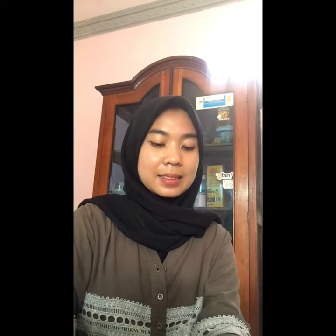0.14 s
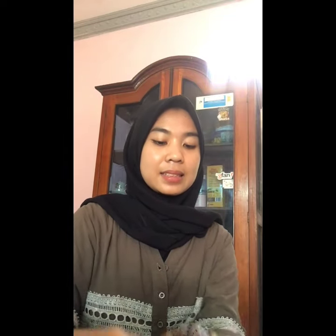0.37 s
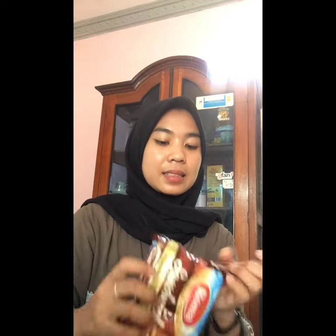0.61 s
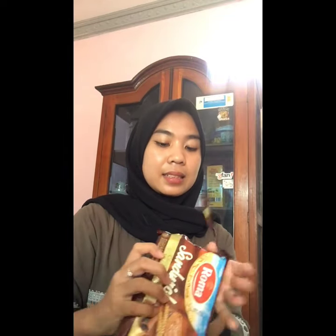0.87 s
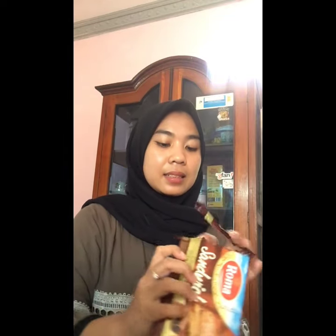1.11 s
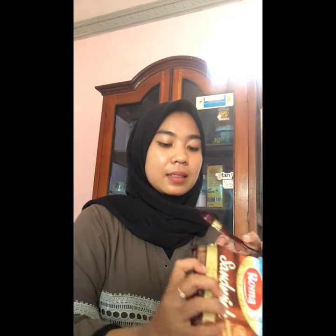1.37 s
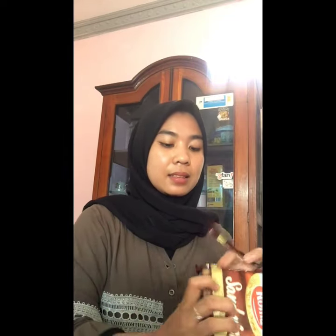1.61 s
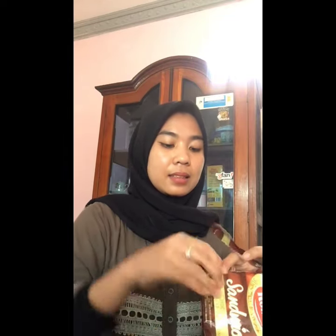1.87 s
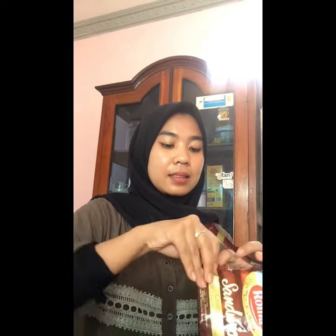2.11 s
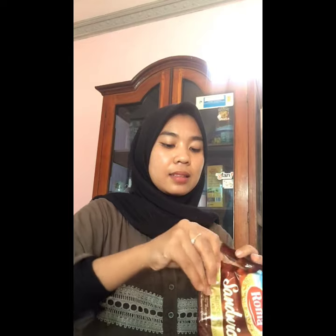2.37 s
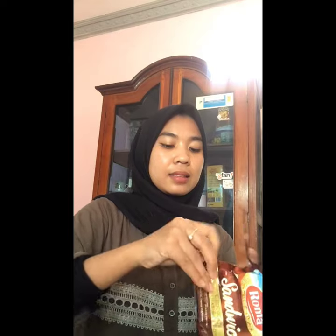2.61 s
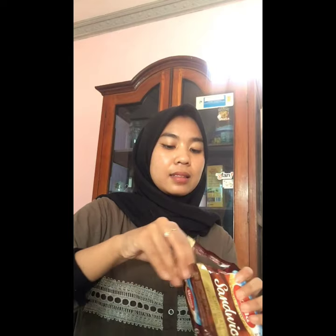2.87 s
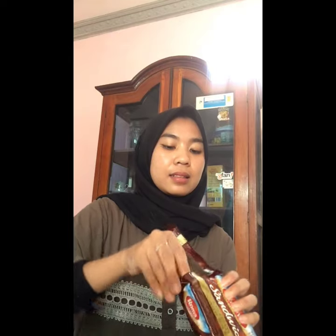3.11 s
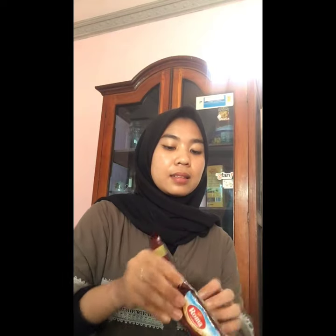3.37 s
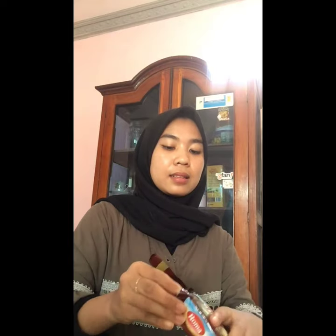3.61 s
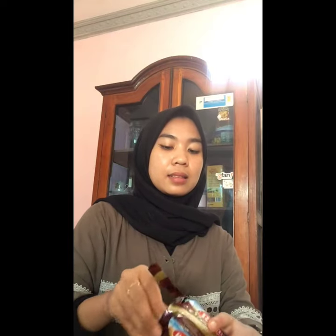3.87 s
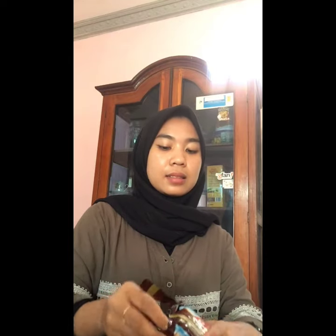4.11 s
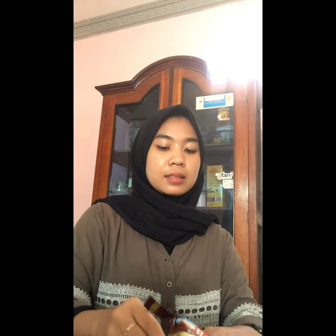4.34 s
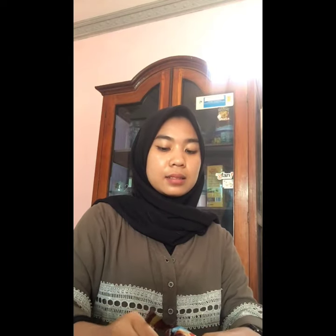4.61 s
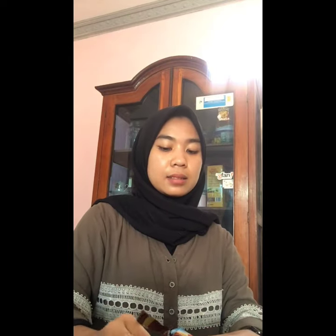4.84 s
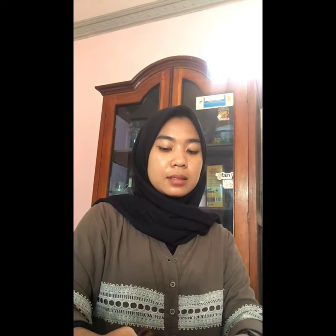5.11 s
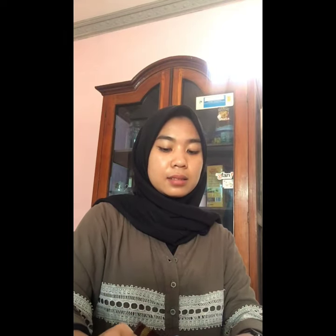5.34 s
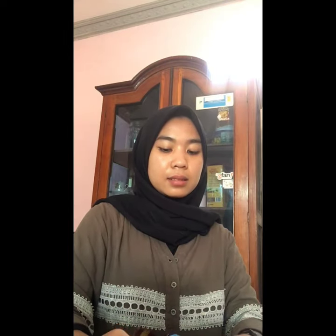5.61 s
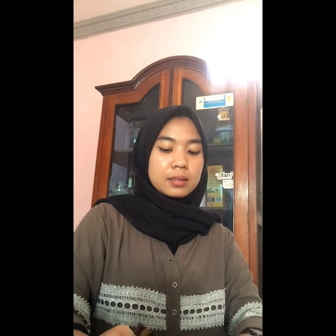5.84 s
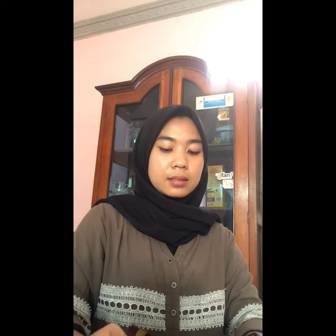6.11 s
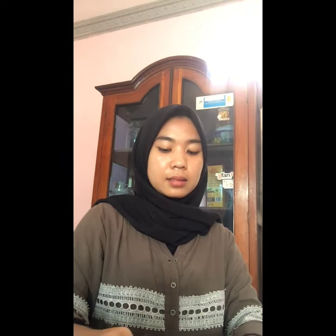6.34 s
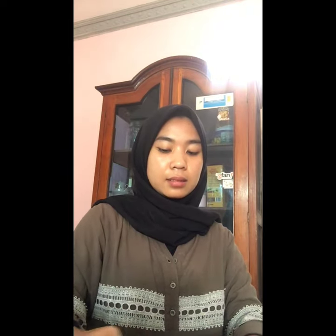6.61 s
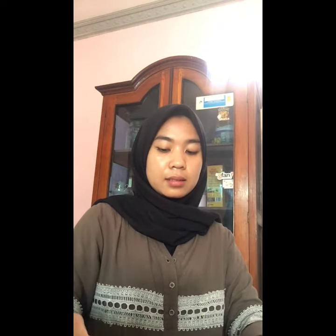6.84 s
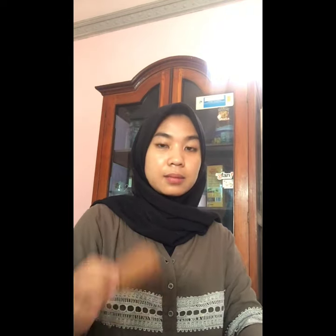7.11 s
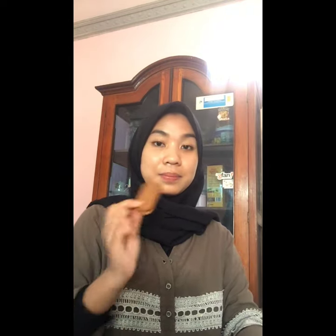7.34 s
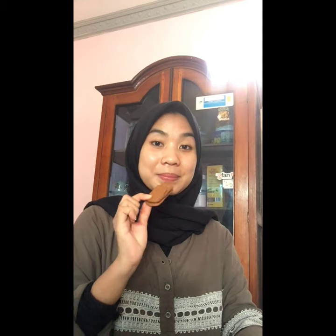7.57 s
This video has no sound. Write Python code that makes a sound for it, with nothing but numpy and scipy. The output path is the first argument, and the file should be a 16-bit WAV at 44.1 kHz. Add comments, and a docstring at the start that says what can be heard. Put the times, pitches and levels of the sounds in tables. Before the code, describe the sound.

In a small room, a phone on a table hears a plastic snack wrapper at close range. From 0 to 0.4 s it crunches and snaps busily, with a heavy low bump near 0.4. Lighter crackles continue to about 1 s, then a lull. At 1.7 s come a bump and short crinkles; at 2.25-2.4 s a tight run of bright, hard snaps as the seam is pulled, the sharpest at 2.36. Scattered crinkles follow, with a bump at 2.8 and another cluster from 3.4 to 4.4, including a thud at 4.2. A distant engine's low hum, present from about 0.5, is strongest around 3.7-5, then sinks in pitch and vanishes by 5.9. Crunches and bumps return from 5.6 to 6.85, with a strong snap at 6.3 and brief gritty rubbing near 6.7. After that only low rumble, faint hiss and tiny ticks remain, with a soft bump at 7.7.

```python
"""Hands lift, crinkle and tear a plastic snack wrapper in a small room: modal bumps of the table that the phone
stands on, crackle of filtered random puffs, and creases that snap as damped resonances with a bright tick.
A distant engine then drones past outside as a sum of shaft orders, its pitch sinking. Filtered noise gives
the rumble, far roar and microphone hiss; a narrow noise band gives a faint airy tone."""
import sys
import numpy as np
from scipy import signal
from scipy.fft import rfft, irfft, next_fast_len
from scipy.io import wavfile
from scipy.ndimage import map_coordinates

SR = 44100
rng = np.random.default_rng(int(sys.argv[2]) if len(sys.argv) > 2 else 0)


def volts_from_decibels(level):
    """Turn decibel levels (scalar or array-like) into linear amplitude factors."""
    exponent = np.asarray(level, float) / 20
    return 10 ** exponent


def output_pcm(signal):
    """Save a mono or channel-first signal as 16-bit PCM at the path in sys.argv[1].

    Samples are clipped to [-1, 1] before scaling.
    """
    pcm = np.clip(np.atleast_2d(signal).T, -1, 1) * 32767
    wavfile.write(sys.argv[1], SR, np.round(pcm).astype(np.int16))


N = 340168  # length [samples]

# Fingers resting and shifting on the film: (time [s], crackle level [dB])
HANDS = [(0, -66), (.5, -56.5), (.8, -54), (1.0, -60.5), (1.15, -57.5), (2.1, -59), (2.5, -55.5),
         (3.26, -58.5), (3.44, -52), (4.2, -49), (4.28, -58), (4.94, -51.5), (5.2, -56.5), (5.45, -57.5),
         (5.58, -67.5), (6.2, -66), (7.0, -66), (7.71, -71.5)]
# Bright part of the crackle and of the snaps: (frequency [Hz], relative density [dB per Hz])
CRISP = [(1500, -38), (2050, -11), (2550, -14), (2950, -6.5), (3250, -4.5), (3650, -6), (4400, -9),
         (5200, -15.5), (6500, -21), (8500, -37), (11000, -30), (15000, -39), (17000, -76)]


def unit(x):
    """Normalisation to unit root-mean-square value."""
    return x / np.sqrt(np.mean(x ** 2) + 1e-20)


def curves(rows):
    """Linear interpolation in time: one value per sample for each column after the time."""
    times, *columns = np.transpose(rows)
    return [np.interp(np.arange(N) / SR, times, column) for column in columns]


def along(points, hz):
    """Interpolation of (frequency [Hz], value) points on a logarithmic frequency axis."""
    f, values = np.transpose(points)
    return np.interp(np.log(hz + 1), np.log(f + 1), values)


def wobble(rate):
    """Band-limited random modulation: a smooth curve through random knots, rate of them a second."""
    coarse = np.arange(0, N + 16, 16)
    knots = rng.standard_normal(int(N * rate / SR) + 4)
    smooth = map_coordinates(knots, [coarse * rate / SR])
    return np.interp(np.arange(N), coarse, smooth)


def coloured(x, spectrum):
    """Minimum-phase filtering: folding the cepstrum makes the filter of a given spectrum causal."""
    m = 2 * next_fast_len(N // 2 + SR // 4)
    magnitude = volts_from_decibels(along(spectrum, np.fft.rfftfreq(m, 1 / SR)))
    cepstrum = irfft(np.log(magnitude + 1e-6), m)
    cepstrum[1:m // 2] *= 2
    cepstrum[m // 2 + 1:] = 0
    response = np.exp(rfft(cepstrum))
    return irfft(rfft(x, m) * response, m)[:N]


def add(track, s, sound):
    """Superposition: mix a sound in at s seconds; it may be under way at the start."""
    i = round(s * SR)
    track[max(i, 0):i + len(sound)] += sound[max(-i, 0):]


def bumps():
    """Dispersion of bending waves in the table top: high modes arrive first, the low bounce builds up last."""
    # Bumps of the pack and the arms:
    # (time [s], base level [dB], bounce frequency [Hz], modes below 200 Hz [dB], modes above [dB])
    blows = [(-0.006, -24, 73, 1.5, 0.5), (0.023, -35, 78, -8, 14.5), (0.188, -32, 75.3, 0, -5),
             (0.26, -26, 62.8, -6, -18), (0.393, -16, 64.6, -1.5, -7.5), (1.698, -30, 67, -1.5, -10.5),
             (2.137, -43, 78, 0, 6), (2.2, -42.5, 79, 15.5, 0), (2.797, -28.5, 60.4, -1.5, -5.5),
             (3.636, -29, 68, -10, -13), (4.002, -30, 67.7, -6, -9.5), (4.198, -21.5, 66.1, -5, -14),
             (5.321, -33, 63.5, 3.5, 1.5), (5.627, -34.5, 79.4, -18, -30), (5.751, -31.5, 76, 4.5, -6),
             (5.848, -34.5, 75.6, 2.5, -13), (6.02, -22.5, 63.4, -1.5, -14), (6.371, -33, 75.7, 7, -26),
             (6.657, -29, 64.5, 6.5, -12), (6.698, -29, 61.7, 4.5, -5), (6.778, -30.5, 82, 1, -7.5),
             (6.844, -30.5, 67, 1.5, -11.5), (7.669, -31, 83, 3.5, -7.5)]
    # Modes of the table top: (frequency [Hz], relative level [dB], 60 dB decay time [s])
    table_modes = [(106.9, -8.5, 0.23), (130, 0, 0.18), (147, -8, 0.14), (261, -1.5, 0.16),
                   (294.8, 0.5, 0.1), (374, -5.5, 0.086), (540, -11, 0.059)]
    still_s, still_db_per_s = 6.868, 1200  # the ringing stops short, as under a resting hand
    out, t = np.zeros(N + SR), np.arange(SR // 2) / SR

    def ring(hz, t60):
        build_up = 1 - np.exp(-(t * hz / 1.17) ** 2)
        return volts_from_decibels(-60 * t / t60) * build_up * np.sin(2 * np.pi * hz * t)

    for s, db, bounce_hz, panel_db, knock_db in blows:
        chance = rng.standard_normal(len(table_modes))
        modes = 0
        for (f, mode_db, t60), c in zip(table_modes, chance):
            drive_db = panel_db if f < 200 else knock_db
            modes = modes + volts_from_decibels(drive_db + mode_db + 2.0 * c) * ring(f, t60)
        damping = volts_from_decibels(-still_db_per_s * (s < still_s) * (s + t - still_s).clip(0))
        add(out, s, volts_from_decibels(db + 3) * (ring(bounce_hz, 0.35) + modes) * damping)
    return out[:N]


def air():
    """Stationary noise shaped by spectra: rumble through the walls, fluttering far roar, hiss and an airy tone."""
    # Background: (time [s], mean rumble level [dB], mean distant roar level [dB])
    background = [(0, -37.5, -62), (.6, -45, -53.5), (1.5, -50, -56), (2.5, -43, -54.5),
                  (3.5, -46.5, -52.5), (4.5, -47.5, -53.5), (5.3, -40.5, -53), (5.9, -39.5, -61.5),
                  (6.8, -43, -58.5), (7.1, -45, -64), (7.71, -43, -61.5)]
    # Spectra of the four noises: (frequency [Hz], relative density [dB per Hz])
    rumble_spectrum = [(12, -67.5), (20, -31), (45, -13.5), (64, -8.5), (76, -5), (89, 0), (102, -9),
                       (129, -9), (189, -11.5), (205, -14.5), (354, -18.5), (480, -41.5), (620, -64.5),
                       (1060, -120)]
    roar_spectrum = [(250, -39.5), (380, -6), (450, -1), (600, 1), (950, -9), (1400, -17.5), (2200, -24.5),
                     (3200, -31), (5200, -52), (8000, -56.5), (12000, -89)]
    hiss_spectrum = [(1500, -35), (3500, 0.5), (6500, -7.5), (9500, -10.5), (10400, -14.5), (13000, -13),
                     (15500, -20)]
    early_spectrum = [(2500, -20.5), (5000, 1), (9000, -2), (10300, -4), (11500, -5), (15500, -6.5),
                      (17000, -61.5)]
    # A faint airy tone sinks and fades: (time [s], centre frequency [Hz], gain [dB])
    airy_path = [(.42, 2890, -93), (.55, 2780, -74), (.8, 2610, -72), (1.1, 2450, -75), (1.3, 2420, -100)]

    def noise(spectrum):
        return unit(coloured(rng.standard_normal(N), spectrum))

    rumble_db, roar_db = curves(background)
    rumble = volts_from_decibels(rumble_db + 1.3 * wobble(6.1)) * noise(rumble_spectrum)
    roar = volts_from_decibels(roar_db + 1.0 * wobble(5)) * noise(roar_spectrum)
    hiss = volts_from_decibels(-81) * noise(hiss_spectrum)
    # a brighter hiss lies on top at first and stops short at 0.39 s
    early = volts_from_decibels(-73.5) * (np.arange(N) < 0.39 * SR) * noise(early_spectrum)
    airy_hz, airy_db = curves(airy_path)
    carrier = np.sin(2 * np.pi * np.cumsum(airy_hz) / SR)
    airy = volts_from_decibels(airy_db) * wobble(250) * carrier  # 250 random knots a second broaden the tone
    return rumble + roar + hiss + early + airy


def slips(rate, spread_db, clump_db, bed):
    """Shot noise in clumps: creases give way, a few much harder, in puffs of about a millisecond over rubbing."""
    chance = rate / SR * volts_from_decibels(clump_db * wobble(30))
    strength = volts_from_decibels(spread_db * rng.exponential(size=N).clip(0, 3.5))
    size = (rng.random(N) < chance) * strength
    puff = np.exp(-np.arange(300) / SR / 0.00073)
    puffs = signal.fftconvolve(size, puff)[:N]
    return (puffs + bed) * rng.standard_normal(N)


def handling():
    """Addition of powers: every grip rises, holds and lets go over the resting fingers; dull and crisp gains."""
    # Squeezes and pulls: (start of hold [s], hold [s], crackle level [dB], crisp over dull [dB])
    grips = [(0.001, 0.0087, -35.5, -24), (0.144, 0.043, -53, -11), (0.184, 0.079, -41, -19),
             (0.302, .11, -51.5, -12.5), (0.813, 0.049, -55, -17), (1.699, 0.015, -42.5, -23),
             (1.736, 0.042, -47.5, -25), (1.814, 0.013, -46.5, -17), (2.286, 0.01, -40, -14),
             (2.358, 0.016, -41.5, -16), (2.396, 0.054, -56, -14), (2.852, 0.019, -44.5, -21),
             (3.972, 0.03, -46.5, -23), (4.174, 0.046, -53.5, -27), (5.642, 0.063, -49, -23),
             (5.84, 0.024, -44, -24), (5.916, 0.063, -49, -21), (6.017, 0.043, -39.5, -22),
             (6.274, 0.05, -49, -22), (6.51, 0.035, -51.5, -29), (6.669, 0.046, -44, -24),
             (6.715, 0.066, -40.5, -22.5), (6.745, 0.098, -47.5, -20), (7.685, 0.05, -55.5, -24)]
    rise_db_per_s, fall_db_per_s = 602, 408.5
    t = np.arange(N) / SR
    rest_db, = curves(HANDS)
    dull_power = volts_from_decibels(rest_db) ** 2
    crisp_power = volts_from_decibels(rest_db - 21) ** 2  # crisp ticks under the dull crunch
    for s, hold, db, bright_db in grips:
        rise_db = rise_db_per_s * (s - t).clip(0)
        fall_db = fall_db_per_s * (t - s - hold).clip(0)
        power = volts_from_decibels(db - rise_db - fall_db) ** 2
        dull_power = dull_power + power
        crisp_power = crisp_power + power * volts_from_decibels(bright_db) ** 2
    return np.sqrt(dull_power), np.sqrt(crisp_power)


def crackle():
    """Filtered shot noise: a dense dull crunch of the whole pack under sparser crisp ticks of the film."""
    # Low part of the crackle: (frequency [Hz], relative density [dB per Hz])
    dull_spectrum = [(240, -27.5), (400, 0), (466, -13.5), (539, -4), (951, -1), (1440, -13), (2500, -31),
                     (3250, -49), (5500, -120)]
    dull_gain, crisp_gain = handling()
    crisp_slips = slips(rate=150, spread_db=5.0, clump_db=4.0, bed=0.09)
    dull_slips = slips(rate=450, spread_db=2.5, clump_db=2.5, bed=0.11) + .4 * crisp_slips
    dull = unit(coloured(dull_slips, dull_spectrum))
    crisp = unit(coloured(crisp_slips, CRISP))
    return volts_from_decibels(-1.5) * dull_gain * dull + volts_from_decibels(-8.5) * crisp_gain * crisp


def small_snaps(count=70):
    """Random buckling between the loud snaps, as strong as the resting fingers; rows like those of the creases."""
    s, chance = rng.uniform(0, N / SR, size=count), rng.standard_normal((count, 3))
    db = np.interp(s, *np.transpose(HANDS)) + 6.5 + 1 * chance[:, 0]
    body_hz = 1100 * np.exp(.27 * chance[:, 1])
    bright_db = -15.5 + 3.3 * chance[:, 2]
    return list(zip(s, db, body_hz, bright_db))


def snaps():
    """Impulsive excitation of resonances: a buckling crease rings at its own pitch, stirs the pack and ticks."""
    # Creases that snap: (time [s], base level [dB], body frequency [Hz], tick over body [dB])
    creases = [(0.084, -27.5, 875, -18.5), (0.103, -46, 1100, -12.5), (0.141, -43, 1080, -10),
               (0.155, -33.5, 1070, -29), (0.173, -28, 900, -14), (0.233, -34, 1150, -28),
               (0.242, -42, 910, -25), (0.25, -35, 990, -15), (0.306, -29.5, 765, -25),
               (0.318, -41.5, 990, -9), (0.367, -32, 950, -27.5), (0.396, -23.5, 644, -34.5),
               (0.508, -29.5, 796, -22), (0.544, -35, 750, -39), (0.647, -37, 685, -39),
               (0.695, -39, 1590, -28), (0.712, -38, 680, -28), (0.735, -44, 1490, -28),
               (0.794, -34.5, 714, -19), (0.83, -33.5, 812, -10.5), (0.986, -40.5, 676, -6.5),
               (1.692, -39, 990, -18), (1.712, -39.5, 1930, -17), (1.751, -35.5, 930, -12),
               (1.816, -51, 1100, 0.5), (1.828, -41.5, 1900, -15), (2.096, -49, 1800, -15),
               (2.14, -47.5, 1700, -14.5), (2.194, -42, 1700, -25), (2.223, -42, 1940, -16),
               (2.262, -35, 1700, -1.5), (2.264, -28.5, 800, -40), (2.277, -35, 1690, -1),
               (2.28, -30.5, 900, -40), (2.329, -25.5, 1630, -12), (2.356, -18.5, 843, -14),
               (2.38, -30.5, 1690, -24), (2.421, -49, 1100, 0.5), (2.553, -42, 624, -13),
               (2.683, -33, 1640, -36), (2.702, -41.5, 910, -12), (2.788, -36.5, 880, -22),
               (2.863, -36.5, 866, -12), (2.945, -40, 1870, -12.5), (3.307, -36.5, 884, -24),
               (3.394, -44, 700, -7), (3.429, -31.5, 714, -17.5), (3.486, -38.5, 700, -16),
               (3.597, -41, 1610, -17), (3.623, -31, 780, -22.5), (3.679, -40.5, 605, -11),
               (3.701, -37, 676, -17), (3.752, -46, 960, -14), (3.826, -54, 1100, -5),
               (3.875, -47, 1100, -5), (3.92, -43.5, 1090, -8), (3.927, -38, 780, -17),
               (3.999, -31.5, 713, -25), (4.136, -33, 770, -25), (4.189, -32, 770, -31),
               (4.235, -33.5, 910, -37), (4.34, -34, 1360, -18.5), (4.411, -32, 1365, -24),
               (4.454, -53, 1100, 0), (4.655, -36.5, 744, -21), (4.693, -58, 1100, 3),
               (4.837, -36, 1130, -16), (5.017, -32.5, 935, -49), (5.127, -42, 1310, -11),
               (5.157, -37, 910, -27), (5.387, -47, 1767, -9), (5.428, -38.5, 960, -26),
               (5.441, -46, 1030, -12), (5.593, -40.5, 1420, -27), (5.618, -37, 1030, -18),
               (5.672, -32, 895, -18), (5.688, -32, 970, -11), (5.709, -27.5, 910, -22),
               (5.826, -28.5, 1400, -25), (5.839, -34, 1280, -16.5), (5.853, -33, 930, -32),
               (5.897, -39, 1420, -15), (5.926, -36, 970, -31), (6.001, -37.5, 1100, -13),
               (6.033, -42, 1100, -10), (6.257, -39, 870, -27), (6.292, -23.5, 830, -26),
               (6.3, -43, 770, -21), (6.331, -36.5, 1210, -33), (6.369, -30.5, 703, -43),
               (6.401, -45, 1490, -16), (6.51, -41, 880, -31), (6.547, -30.5, 1150, -31),
               (6.584, -34, 960, -19.5), (6.648, -34.5, 960, -30), (6.709, -32, 950, -30),
               (6.719, -35, 990, -27), (6.786, -32, 1390, -25), (6.799, -36.5, 990, -10),
               (6.83, -39, 1750, -27), (6.996, -49, 1700, -30), (7.266, -50.5, 1130, -21),
               (7.393, -44, 885, -18)]
    # Resonances of the pack: (frequency [Hz], bandwidth [Hz], relative level [dB])
    film = [(750, 210, -3.5), (1150, 155, -1), (1690, 260, -0.5), (1940, 200, -9), (3160, 225, -13.5)]
    near_from_s, near_to_s = 1.6, 3.1  # the pack is held close to the phone: its highest resonance sings louder
    body, ticks, t = np.zeros(N + SR), np.zeros(N + SR), np.arange(SR // 20) / SR
    body_rise = 1 - np.exp(-(t / 0.00058) ** 2)
    tick_rise = 1 - np.exp(-(t / 0.00055) ** 2)
    tick_decay = volts_from_decibels(7.5 - 60 * t / 0.0038) + volts_from_decibels(-21 - 60 * t / 0.03)
    for s, db, hz, bright_db in creases + small_snaps():
        chance_db = 3 * rng.standard_normal(len(film))
        bend = np.exp(.025 * rng.standard_normal())  # shifts all the pack's resonances together
        own = volts_from_decibels(-60 * t * hz / 13) * np.sin(2 * np.pi * hz * t)  # falls 60 dB in 13 cycles
        stiff_db = 0.82 * (bright_db + 16.5)  # a crisper crease drives the upper resonances harder
        near_db = 4.5 * (near_from_s < s < near_to_s)
        pack = 0
        for (f, width, film_db), c in zip(film, chance_db):
            gain = volts_from_decibels(film_db + c + stiff_db * (f > 1400) + near_db * (f == film[-1][0]))
            pack = pack + gain * np.exp(-np.pi * width * t) * np.sin(2 * np.pi * f * bend * t)
        add(body, s, volts_from_decibels(db + 3.0) * body_rise * (own + 0.41 * pack))
        add(ticks, s, volts_from_decibels(db + bright_db) * tick_decay * tick_rise * rng.standard_normal(len(t)))
    impulse = np.arange(N) == 0
    tick_norm = np.linalg.norm(coloured(impulse, CRISP))  # gives the tick filter unit energy
    return body[:N] + coloured(ticks[:N], CRISP) / tick_norm


def room(x, count=3000):
    """Frequency-dependent reverberation; the moving pack gets a new room answer every count samples."""
    # Reverberation: (frequency [Hz], 60 dB decay time [s])
    decay_times = [(300, 0.15), (1500, 0.29), (4000, 0.39), (10000, 0.19)]
    out = np.zeros(N + SR)
    noise = rng.standard_normal((N // count + 1, SR // 3))
    hz, t, bins = signal.stft(noise, SR, nperseg=256)
    decay = volts_from_decibels(-60 * t / along(decay_times, hz)[:, None])
    tails = signal.istft(bins * decay, SR, nperseg=256)[1]
    for k, tail in enumerate(tails):
        piece = x[k * count:(k + 1) * count]
        answer = signal.fftconvolve(piece, tail / np.linalg.norm(tail))
        add(out, k * count / SR + .0034, answer)  # 3.4 ms after the direct sound
    return out[:N]


def engine():
    """Harmonic synthesis of shaft orders that follow the engine's nearness and swell or sink as echoes shift."""
    # Shaft speed as heard, sinking while the engine passes: (time [s], rotation frequency [Hz])
    shaft = [(.5, 30), (1.9, 30), (2.4, 29.9), (2.9, 29.55), (3.4, 29.3), (4.4, 29.1), (4.9, 28.95),
             (5.1, 28.7), (5.4, 28.05), (5.7, 27.6)]
    # Nearness of the engine: (time [s], base level [dB])
    nearness = [(0.6, -52.5), (1.5, -49), (2.5, -51), (3.2, -48), (3.7, -44.5), (4.3, -45), (4.9, -46),
                (5.3, -47.5), (5.7, -65)]
    # Shaft orders: (multiple of shaft speed, level over the base [dB], slow waver [dB])
    orders = [(2, 1.5, 0.5), (3, -1.5, -1), (4, -12, 2), (5, -7.5, 1.5), (6, -3, 2.5), (7, -2, 0),
              (8, -2.5, 1.5), (9, -10.5, 0), (10, -10, 2.5), (11, -13, 3), (12, -13, 3), (13, -13, 3.5),
              (14, -23.5, 0.5), (18, -18, 2.5), (24, -15.5, 3.5)]
    # Single orders swell or sink: (multiple, middle [s], half length to 1/e of the dB change [s], change [dB])
    swells = [(2, 1.41, 0.099, 6), (2, 3.55, 0.33, 5), (2, 4.56, 0.46, 9.5), (2, 5.24, 0.14, -11),
              (3, 3, 0.079, 4.5), (3, 3.7, 0.12, 7.5), (3, 4.27, 0.14, 12), (3, 4.65, 0.38, -27),
              (5, 1.44, 0.18, -10), (5, 2.25, 0.18, 13.5), (5, 3.61, 0.21, 10.5), (5, 4.82, 0.28, 16.5),
              (6, 2.24, 0.2, 6), (6, 2.9, 0.068, 6.5), (6, 3.8, 0.38, 2), (6, 5.36, 0.14, 10.5),
              (7, 1.08, 0.2, -15), (7, 2.51, 0.19, 5.5), (7, 3.526, 0.31, 7.5), (7, 4.264, 0.26, 8),
              (7, 4.84, 0.26, 6), (8, 0.58, 1, 4), (8, 3.6, 0.4, -5.5), (7, 4.0, 0.071, -15),
              (10, 4.7, 0.59, -4.5), (9, 3.9, 0.25, -6), (8, 5.33, 0.12, 6.5), (9, 3.42, .4, 8.5),
              (10, 3.6, .6, 4.5), (12, 4.55, 0.21, 8), (14, 4.5, 0.57, 15)]
    turn = 2 * np.pi * np.cumsum(curves(shaft)[0]) / SR
    level_db, = curves(nearness)
    t = np.arange(N) / SR
    fade = np.clip((t - .45) / 0.15, 0, 1) * np.clip((5.9 - t) / 0.36, 0, 1)
    drone = 0
    for multiple, order_db, waver_db in orders:
        k = round(multiple)
        db = level_db + order_db + waver_db * wobble(3.49)
        for order, s, half, swell_db in swells:
            if round(order) == k:
                db = db + swell_db * np.exp(-((t - s) / half) ** 2)
        gain = volts_from_decibels(db + 3 + 2.2 * wobble(12))
        phase = rng.uniform(0, 2 * np.pi) + 0.07 * k * wobble(7)
        drone = drone + gain * np.sin(k * turn + phase)
    return fade * drone


def slides():
    """Friction noise: dense bright grit where film rubs on film or tears."""
    # The film slides over itself: (middle [s], half length to 1/e [s], level [dB])
    rubs = [(6.735, 0.04, -63.5), (6.045, 0.027, -70), (1.8, .025, -72)]
    # Rubbing film: (frequency [Hz], relative density [dB per Hz])
    scrape_spectrum = [(2300, -19), (3200, 1), (4000, 3.5), (4800, -6.5), (7000, -19.5), (12000, -23),
                       (17000, -59)]
    t = np.arange(N) / SR
    swell = sum(volts_from_decibels(db) * np.exp(-((t - s) / half) ** 2) for s, half, db in rubs)
    grit = slips(rate=650, spread_db=3.0, clump_db=5.0, bed=.15)
    return swell * unit(coloured(grit, scrape_spectrum))


def scene():
    """Superposition: wrapper, direct and reverberant, table bumps through the stand, drone and air behind."""
    wrapper = crackle() + snaps() + slides()
    reverberation = volts_from_decibels(-9.5) * room(wrapper)
    return (wrapper + reverberation + bumps() + engine() + air())[None]


def roll_off(x):
    """The treble ends steeply here."""
    return signal.sosfilt(signal.butter(12, 15500, fs=SR, output="sos"), x)


def record(dry):
    """Storage of the superposed sound pressure: the finished mix as the phone keeps it."""
    return roll_off(dry)


dry = scene()
out = record(dry)
output_pcm(out)
```